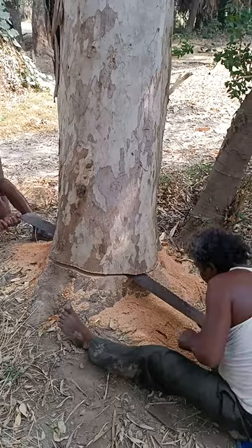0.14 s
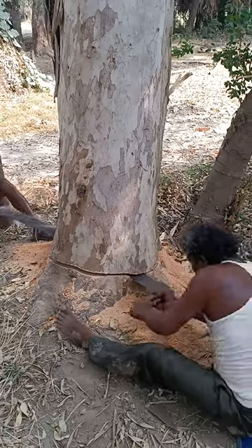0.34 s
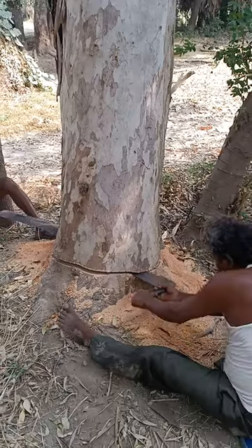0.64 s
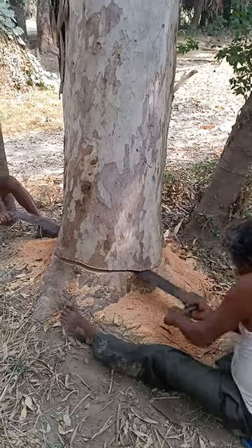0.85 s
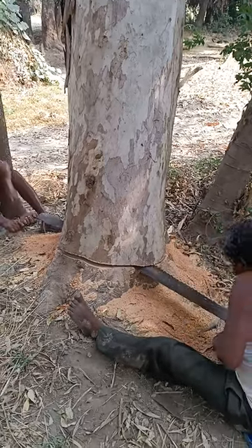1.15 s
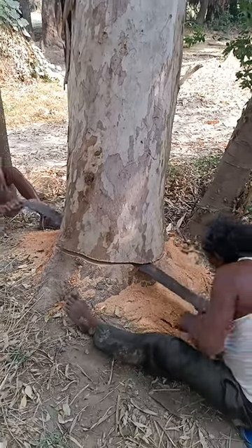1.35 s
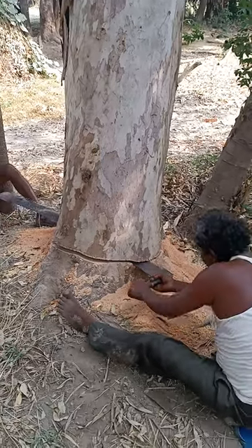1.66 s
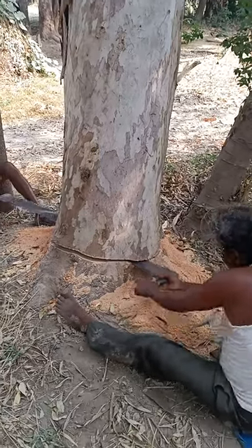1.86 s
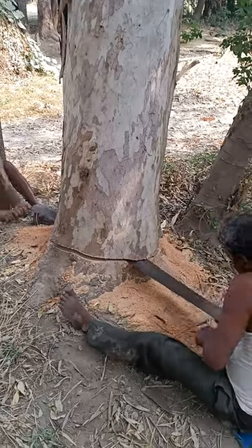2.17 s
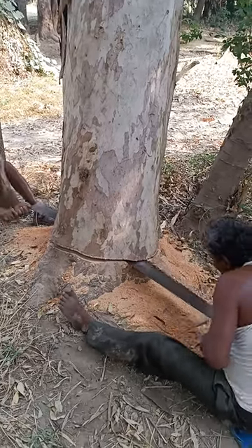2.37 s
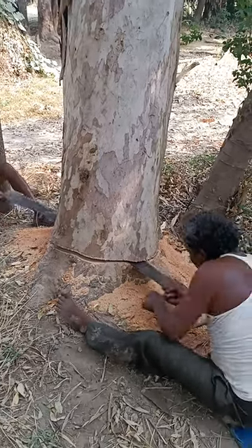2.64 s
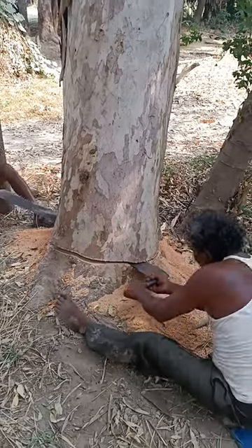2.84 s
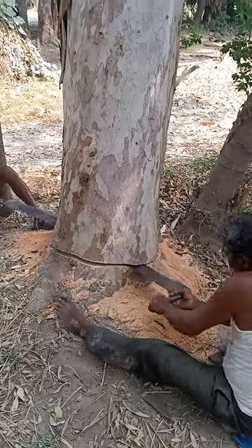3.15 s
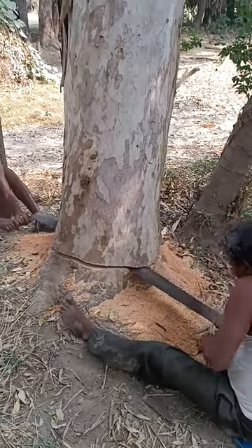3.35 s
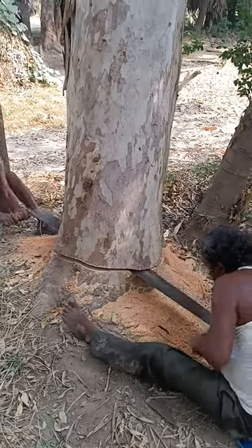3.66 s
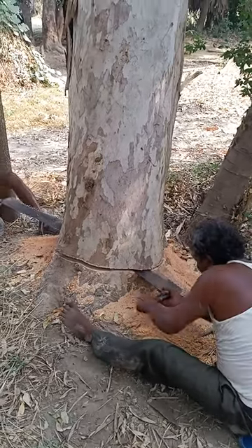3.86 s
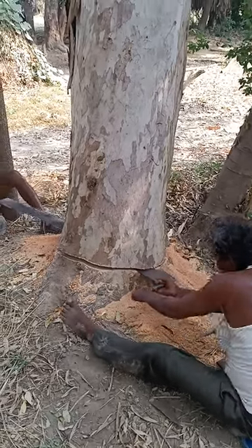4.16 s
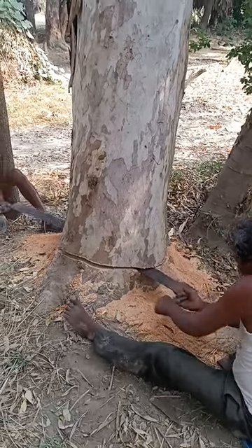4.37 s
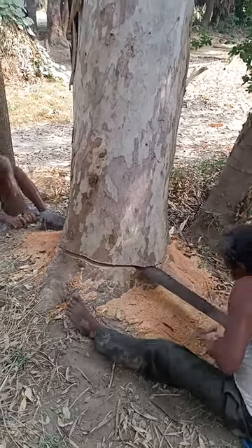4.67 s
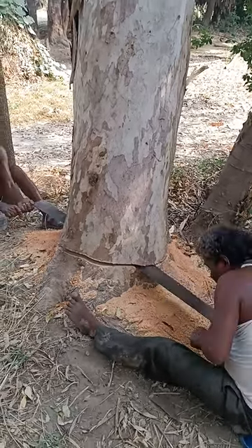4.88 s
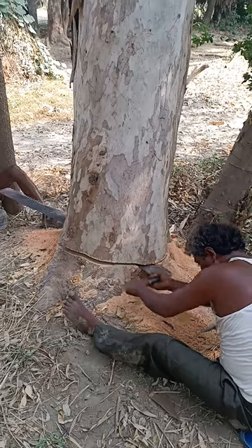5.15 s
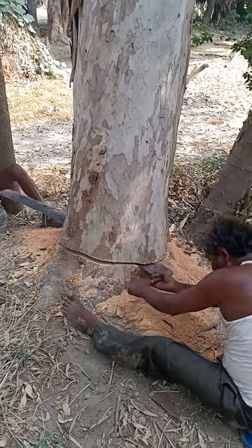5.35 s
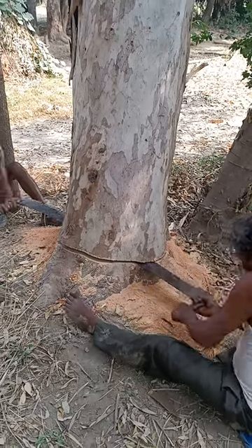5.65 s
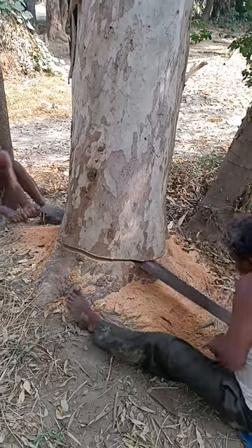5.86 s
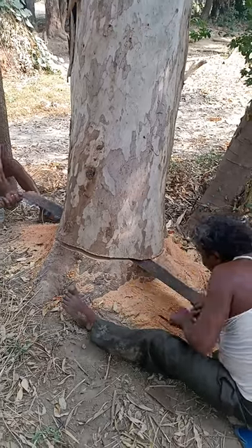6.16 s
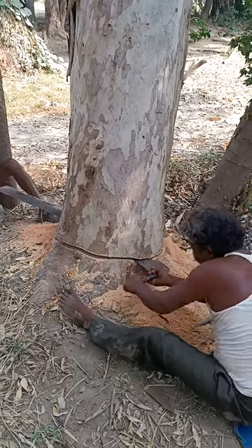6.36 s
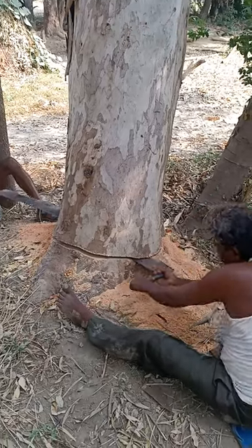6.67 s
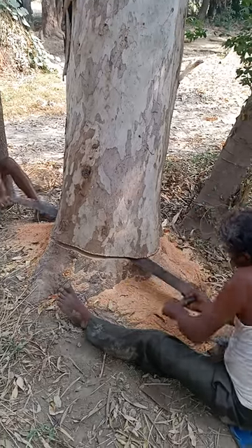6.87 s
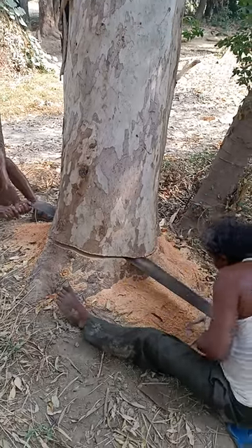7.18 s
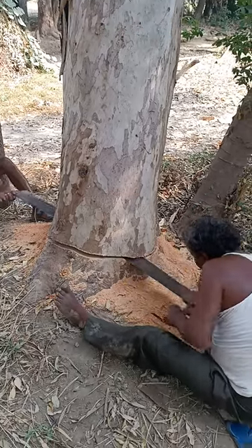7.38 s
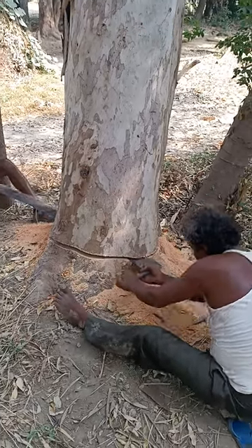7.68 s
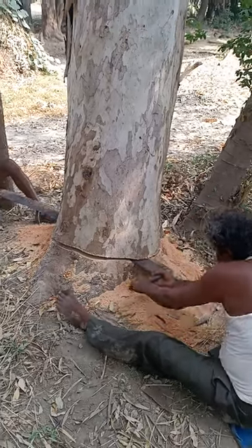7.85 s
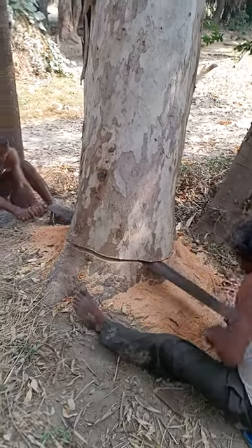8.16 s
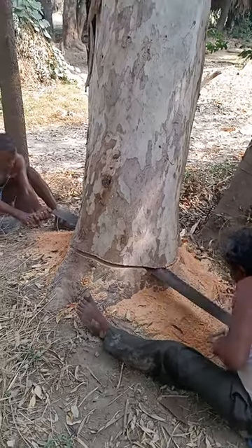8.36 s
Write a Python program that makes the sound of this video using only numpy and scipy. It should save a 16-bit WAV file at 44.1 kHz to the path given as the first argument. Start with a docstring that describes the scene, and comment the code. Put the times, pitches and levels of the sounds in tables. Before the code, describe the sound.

A long hand saw rasps back and forth through a thick tree trunk in steady strokes, while a distant engine thumps quickly and evenly behind.

```python
"""In a hushed grove a long hand saw is pulled to and fro through a standing trunk, near two microphone ports.
Dense clumped ticks, fibres torn by the teeth, excite resonances of wood and blade; now and then a tooth
snags in a decaying noise burst with a snap. Far off a single-cylinder engine thumps steadily in short
decaying tones with echoes, over a hush of spectrally shaped noise."""
import sys
import numpy as np
from scipy import signal
from scipy.fft import rfft, irfft
from scipy.io import wavfile
from scipy.ndimage import uniform_filter1d

SR = 44100
rng = np.random.default_rng(int(sys.argv[2]) if len(sys.argv) > 2 else 0)


def attenuation_scalar(level_db):
    """Turn a level in dB into a linear amplitude multiplier (20 dB per decade)."""
    decades = np.asarray(level_db, float) / 20
    return 10 ** decades


def master_out(mix):
    """Clip the mix to full scale and print it as 16-bit PCM to the path in sys.argv[1]."""
    frames = np.transpose(np.atleast_2d(mix))
    ceiling = np.clip(frames, -1, 1)
    pcm = np.round(ceiling * 32767).astype(np.int16)
    wavfile.write(sys.argv[1], SR, pcm)


N = 375732

# Relative spectrum of the hush: (frequency [Hz], density [dB per Hz])
HUSH_SPECTRUM = [(18, -44), (30, -19), (82, 1), (150, -4), (246, -14.5), (397, -6.5), (523, -18.5),
                 (742, 3.5), (954, -66), (1050, -3), (2540, -5), (3690, -14.5), (6570, -13), (12000, -63),
                 (15600, -102), (22000, -120)]
# Coherence of the hush between the ports: (frequency [Hz], likeness [0-1])
HUSH_COHERENCE = [(60, 0.32), (150, 0.86), (300, 0.64), (700, 0.27), (1400, 0.052), (5000, 0.038)]
HUSH_DB = -52.5  # rms

# Nominal tones of one firing: (delay [s], frequency [Hz], rise [s], fall by 1/e [s], peak [dB], left-right [dB])
FIRING_TONES = [(-.026, 80, .011, .012, -46.5, 1.5), (.0005, 775, .012, .003, -44, -2.5),
                (-.004, 1075, .006, .014, -58, 0), (.004, 395, .005, .015, -62, 0)]
# Reflections off distant trees and walls: (delay [s], level [dB], left-right [dB])
ECHOES = [(.028, -11, -2), (.05, -16, 2)]
FIRST_FIRING_S, FIRINGS_PER_S, SLOWING_PER_S2 = -.116, 11.117, .0046  # the rate is that at the first firing

# Times in which the blade moves, one stroke a row: (start [s], end [s])
STROKE_SPANS = [(.03, .55), (.69, 1.21), (1.24, 1.75), (1.84, 2.38), (2.4, 2.92), (3.02, 3.56),
                (3.59, 4.09), (4.26, 4.79), (4.81, 5.33), (5.44, 5.98), (6, 6.51), (6.66, 7.2),
                (7.23, 7.75), (7.87, 8.39), (8.41, 8.52)]
# Bite of the teeth, one curve a stroke: (time [s], blade rasp level [dB])
BITE_CURVES = [
    [(0.03, -77), (0.082, -45), (0.134, -47.5), (0.186, -35.5), (0.282, -27.5), (0.288, -26), (0.384, -26),
     (0.504, -42), (0.55, -66)],
    [(0.69, -68), (0.786, -45), (0.98, -28.5), (1.088, -28), (1.096, -30.5), (1.122, -28.5), (1.128, -33),
     (1.144, -44.5), (1.21, -54)],
    [(1.24, -59), (1.256, -66), (1.294, -47.5), (1.444, -29.5), (1.512, -28.5), (1.524, -26), (1.612, -30),
     (1.698, -44.5), (1.75, -68)],
    [(1.84, -74), (1.846, -62.5), (2.022, -34), (2.062, -43), (2.086, -34), (2.222, -29), (2.238, -26.5),
     (2.32, -41.5), (2.38, -69)],
    [(2.4, -70), (2.47, -42), (2.556, -34), (2.654, -25), (2.668, -27.5), (2.774, -26), (2.848, -40.5),
     (2.92, -68)],
    [(3.02, -63.5), (3.13, -42.5), (3.142, -35.5), (3.182, -36.5), (3.218, -34), (3.268, -41.5),
     (3.318, -28), (3.438, -28.5), (3.56, -56.5)],
    [(3.59, -71), (3.65, -49), (3.682, -49.5), (3.722, -35), (3.742, -36.5), (3.854, -23), (3.87, -24.5),
     (4.01, -29), (4.09, -63)],
    [(4.26, -70), (4.304, -45), (4.35, -55), (4.366, -35.5), (4.468, -37), (4.472, -29.5), (4.674, -32.5),
     (4.746, -52), (4.79, -76)],
    [(4.81, -71), (4.848, -52), (4.936, -40), (4.942, -34.5), (5.05, -25.5), (5.064, -29), (5.154, -22.5),
     (5.218, -37.5), (5.33, -64)],
    [(5.44, -67), (5.484, -47), (5.528, -50.5), (5.544, -41), (5.722, -32), (5.726, -28), (5.898, -37),
     (5.952, -45), (5.98, -63)],
    [(6.0, -70), (6.014, -53), (6.176, -31), (6.264, -26), (6.368, -27), (6.396, -26), (6.406, -31),
     (6.442, -38.5), (6.51, -62)],
    [(6.66, -62.5), (6.666, -58.5), (6.858, -34.5), (6.89, -34.5), (6.952, -31.5), (6.984, -35.5),
     (6.996, -31.5), (7.126, -33.5), (7.2, -74)],
    [(7.23, -69), (7.266, -51), (7.366, -32.5), (7.432, -30.5), (7.438, -27), (7.604, -23.5),
     (7.612, -31.5), (7.636, -32.5), (7.75, -74)],
    [(7.87, -68), (7.898, -56.5), (8.064, -32), (8.132, -36), (8.142, -29.5), (8.21, -39), (8.266, -28),
     (8.3, -30), (8.39, -65)],
    [(8.41, -72), (8.446, -46), (8.456, -48), (8.466, -42.5), (8.486, -44.5), (8.52, -36)],
]
# Mid-course colour of each stroke against its rasp, and its change over the time of the longest stroke:
# (trunk boom [dB], kerf [dB], sizzle [dB], kerf gained [dB], sizzle gained [dB])
STROKE_COLOURS = [(-11.5, -4, -1.5, 1, -2), (-7.5, -3, -3, -8.5, -5), (-8.5, -4, -0.5, 10, -9),
                  (-10.5, -3, -2, 4, -4), (-9.5, -4, -1, 10.5, -2.5), (-10, -2, -3, 4, -2),
                  (-12.5, -5, -1.5, -1, -1.5), (-8, -3, 0, 1, 1), (-10, -4.5, -1, 7, -10.5),
                  (-9, -1.5, -2, 2, 1), (-10, -5, -1, 3.5, -2), (-10.5, -3, -1, -3, 2.5),
                  (-11, -5.5, -0.5, 6, -2.5), (-10.5, -1, -2, 6, -7), (-6.5, -2.5, -2, 4, -3.5)]
# Trunk boom gained over the time of the longest stroke: (away [dB], back [dB])
BOOM_GAINED_DB = [-3, 9]
# The blade's two strongest rings, rows away and back, over the time of the longest stroke:
# (starting frequency [Hz], rise at the middle [Hz], ending frequency [Hz])
LOWER_RING = [(2770, 160, 2520), (2610, 130, 2730)]
UPPER_RING = [(6180, 330, 5360), (5950, 60, 6000)]
COLOUR_WANDER_DB, COLOUR_WANDER_S = 1.5, 0.043
RING_WANDER, RING_WANDER_S = 0.011, 0.056  # fraction of the frequency, smoothing time

# Relative resonance spectra of trunk, wood at the kerf, blade, blade top and a breaking fibre:
# (frequency [Hz], density [dB per Hz])
TRUNK_MODES = [(65, -38), (110, -21.5), (343, -6), (407, 1), (462, -2), (503, -14), (530, -5), (690, -37),
               (1170, -120)]
KERF_MODES = [(290, -41.5), (500, -7), (616, -8), (746, -1.5), (808, -3), (971, 2), (1200, -7.5),
              (1300, -12), (1690, -49), (2860, -120)]
BLADE_MODES = [(710, -50), (1200, -4), (1790, -5), (1950, -4.5), (2280, -0.5), (2480, -3.5), (2810, 0.5),
               (3780, -4.5), (4300, -8.5), (5590, -58), (9460, -120)]
SIZZLE_MODES = [(2410, -49), (4100, -10), (4660, -4.5), (5100, -5.5), (6270, 0), (7630, -9), (8530, -16.5),
                (9700, -19), (10500, -24), (12500, -32), (13800, -27), (15600, -31)]
SNAP_MODES = [(120, -46), (200, -25), (1270, 8), (2420, 16), (4770, -32), (6170, -27), (10700, -48),
              (13600, -9), (16000, -37)]

# Snags of single teeth:
# (time [s], crumble on the blade [dB], treble against wood [dB], fall by 60 dB [s], snap [dB])
SNAGS = [(0.076, -38, 5, 0.024, -45), (0.271, -22.5, 10, 0.045, -35), (.367, -19, -6, 0.026, -25),
         (.387, -14, 2, 0.021, -30), (.797, -39, 7, .039, -42), (1, -21, -4, .03, -23),
         (1.1272, -12.5, 0, 0.01, 0.5), (1.981, -36, 9, 0.035, -45), (2.08, -32, 20, 0.034, -45),
         (3.286, -31, 25, 0.074, -30), (3.34, -33, -6, 0.014, -21), (3.432, -24, -2, 0.013, -6),
         (3.845, -20, 16, 0.028, -25), (4.01, -29.5, 22, 0.034, -35), (4.3638, -33.5, 2, .066, -35),
         (4.4727, -24, -14, 0.035, -28), (4.942, -35, 17, .054, -35), (5.4795, -40, -17, 0.11, -36),
         (5.7284, -19, 9, 0.028, -20), (5.846, -25, 15, 0.044, -35), (5.8863, -30, 19, 0.04, -35),
         (6.372, -18, 1, 0.026, -30), (6.92, -24, -14, 0.031, -40), (6.9468, -16, 25, 0.013, -25),
         (6.953, -21, 28, 0.018, -27), (6.986, -28, 12, .045, -40), (7.022, -23, -12, 0.025, -30),
         (7.067, -30.5, 19, 0.062, -40), (7.482, -23.5, -7, 0.11, -30), (7.603, -25, 9, 0.016, -16),
         (7.9621, -39.5, 5, 0.096, -45), (8.224, -23, -8, .04, -40), (8.2557, -20, -17, 0.05, -22)]
SNAG_EDGES_DB, SNAG_BOOM_DB = -8, -4  # wood and sizzle against blade, trunk against wood

# The two ports hearing the saw: (frequency [Hz], left-right [dB], left lead [radians], likeness [0-1])
PORTS = [(150, 1.5, 0.5, 1), (380, -3, -0.45, 0.98), (493, -5, 1.5, 0.99), (797, 7, 0.22, 0.87),
         (1284, 4, -2.04, 1), (1440, -4, 1, 0.94), (2380, -1, 0.5, 0.88), (2920, 2.5, 1, 0.42),
         (2900, 6.5, -0.5, 0.3), (4060, -1.5, -1.5, 0.63), (4460, 5, -0.5, 0.4), (6070, -2, -1.5, 0.64),
         (7850, -11, -0.6, 0.22), (8370, 2, -1.5, 1), (12700, -5.5, -2.5, 0.3)]


def evened(x):
    """Power normalization: scales a signal to rms 1."""
    return x / np.sqrt(np.mean(x ** 2) + 1e-20)


def read(points, hz):
    """Interpolation on a logarithmic frequency axis: the columns of a table at these frequencies."""
    f, *columns = np.transpose(points)
    return [np.interp(np.log(hz + 1), np.log(f + 1), c) for c in columns]


def hush():
    """Partly coherent noise: distant air and engine blur as random short-time spectra in drifting patches."""
    frames, hz = N // 256 + 5, np.fft.rfftfreq(1024, 1 / SR)
    a, b, c, d, patches = rng.standard_normal((frames, 513, 5)).T
    patches = uniform_filter1d(patches, size=10, axis=0)
    patches = evened(uniform_filter1d(patches, size=10, axis=1))
    same = np.clip(read(HUSH_COHERENCE, hz)[0], 0, 1)[:, None]
    left = a + 1j * b
    right = same * left + np.sqrt(1 - same ** 2) * (c + 1j * d)
    density_db = read(HUSH_SPECTRUM, hz)[0][:, None] + 2.2 * patches
    spectra = np.array([left, right]) * attenuation_scalar(density_db)
    noise = signal.istft(spectra, nperseg=1024, noverlap=768)[1][:, :N]
    return attenuation_scalar(HUSH_DB) * evened(noise)


def engine():
    """Periodic excitation: each firing sends a low thump and short pipe tones, a little uneven, with two echoes."""
    even = np.arange(0, N / SR - 2 * FIRST_FIRING_S, 1 / FIRINGS_PER_S)
    fired = FIRST_FIRING_S + even + SLOWING_PER_S2 / FIRINGS_PER_S * even ** 2 / 2
    pad, t = SR // 4, np.arange(SR // 8) / SR
    direct = np.zeros((2, N + SR))
    for start, chance in zip(fired, rng.standard_normal((len(fired), len(FIRING_TONES), 2))):
        for (delay, hz, rise, fall, db, pan_db), (louder, sharper) in zip(FIRING_TONES, chance):
            attack = np.sin(np.pi / 2 * t / rise) ** 2
            shape = np.where(t < rise, attack, np.exp((rise - t) / fall))
            tone = shape * np.sin(2 * np.pi * hz * (1 + .005 * sharper) * t) * attenuation_scalar(db + 1.2 * louder)
            at = pad + round((start + delay) * SR)
            direct[:, at:][:, :len(t)] += tone * attenuation_scalar([[pan_db / 2], [-pan_db / 2]])
    out = direct.copy()
    for delay, db, pan_db in ECHOES:
        out += attenuation_scalar([[db + pan_db / 2], [db - pan_db / 2]]) * np.roll(direct, round(delay * SR), axis=1)
    return out[:, pad:pad + N]


def grove(x, low_hz):
    """Diffuse scattering: trunks and ground add a short tail, other for each port; long waves pass them by."""
    t = np.arange(SR // 2) / SR
    decay = attenuation_scalar(-60 * t / 0.23)  # 60 dB in 0.23 s
    tail = rng.standard_normal((2, len(t))) * decay * np.minimum(t / 0.0053, 1)
    highpass = signal.butter(2, low_hz, "high", fs=SR)
    tail = signal.lfilter(*highpass, tail / np.linalg.norm(tail[0]))
    return signal.oaconvolve(x, tail, axes=1)[:, :N]


def wobble(seconds):
    """Low-pass random modulation: smooth chance of rms 1, averaged twice over this time."""
    span = round(seconds * SR) + 1
    return evened(uniform_filter1d(uniform_filter1d(rng.standard_normal(N), span), span))


def moving_ring(table, way, done):
    """Resonance shift: a blade ring's frequency glides along the stroke and wanders a little."""
    start_hz, rise_hz, end_hz = np.array(table)[way].T
    glide = start_hz + (end_hz - start_hz) * done + rise_hz * np.sin(np.pi * done)
    return glide * (1 + RING_WANDER * wobble(RING_WANDER_S))


def stroke_controls():
    """Reciprocating drive: rasp level, three colours and two ring pitches from the stroke and its progress."""
    t, (starts, ends) = np.arange(N) / SR, np.transpose(STROKE_SPANS)
    which = np.maximum(np.searchsorted(starts, t, "right") - 1, 0)
    done = np.clip((t - starts[which]) / (ends - starts).max(), 0, 1)  # 1 = the longest stroke's time
    way = which % 2  # 0 away, 1 back
    *colours, kerf_gained, sizzle_gained = np.array(STROKE_COLOURS)[which].T
    gained = np.array(BOOM_GAINED_DB)[way], kerf_gained, sizzle_gained
    colours = [c + g * (done - .5) + COLOUR_WANDER_DB * wobble(COLOUR_WANDER_S)
               for c, g in zip(colours, gained)]
    rings = [moving_ring(table, way, done) for table in (LOWER_RING, UPPER_RING)]
    rasp_db = np.interp(t, *np.concatenate(BITE_CURVES).T)
    return rasp_db, *colours, *rings


def ticks(per_s, spread_db):
    """Random impulse train: ticks, a few of them large; two rows share sizes but not signs."""
    size = attenuation_scalar(spread_db * np.minimum(rng.exponential(1, N), 5))
    size = size * (rng.random(N) < per_s / SR)
    return evened(size * rng.choice([-1., 1.], (2, N)))


def flecks(lo_hz, hi_hz, per_s, t60, count=14):
    """Modal excitation: sparser ticks, each ringing one narrow mode of the many in this range."""
    hits, mode = ticks(per_s, 3.56), rng.integers(0, count, N)
    r = 1000 ** (-1 / (t60 * SR))  # falls by 60 dB in t60
    out = np.zeros((2, N))
    for k, angle in enumerate(2 * np.pi * np.geomspace(lo_hz, hi_hz, count) / SR):
        out += signal.lfilter([np.sin(angle)], [1, -2 * r * np.cos(angle), r * r], hits * (mode == k))
    return evened(out)


def resonate(x, hz, width):
    """Heterodyning: shifts the curve hz to zero, smooths, shifts back, a moving resonance of gain 1."""
    turn = np.exp(2j * np.pi * np.cumsum(hz) / SR)
    r = np.exp(-np.pi * width / SR)
    return 2 * (turn * signal.lfilter([1 - r], [1, -r], x / turn)).real


def ring(spectrum):
    """Minimum phase: the causal response of energy 1 that has this spectrum."""
    hz = abs(np.fft.fftfreq(8192, 1 / SR))
    log_gain = np.log(attenuation_scalar(np.maximum(read(spectrum, hz)[0], -90)))
    taps = np.fft.ifft(np.exp(np.conj(signal.hilbert(log_gain)))).real[:3072]
    return taps / np.linalg.norm(taps)


def mottled(x, patchy_db):
    """Time-varying contact: as the teeth in contact keep changing, patches of the spectrum swell and fade."""
    z = signal.stft(x, nperseg=256, noverlap=192)[2]
    patches = rng.standard_normal(z.shape[:0:-1]).T
    patches = uniform_filter1d(patches, size=3, axis=0)
    patches = evened(uniform_filter1d(patches, size=16, axis=1))
    return signal.istft(z * attenuation_scalar(patchy_db * patches), nperseg=256, noverlap=192)[1][:, :N]


def snags():
    """Transient fracture: a snag crumbles and snaps a fibre; rows for trunk, kerf, blade, sizzle and snap."""
    out, t = np.zeros((5, 2, N + SR)), np.arange(SR // 8) / SR
    for (s, db, bright_db, t60, snap_db), crumbs in zip(SNAGS, rng.standard_normal((len(SNAGS), 2, SR // 8))):
        at = round(s * SR)
        burst = crumbs * attenuation_scalar(db - 60 * t / max(t60, .005)) * np.minimum(t / .001, 1)
        wood_db, sizzle_db = SNAG_EDGES_DB - bright_db / 2, SNAG_EDGES_DB + bright_db / 2
        shares = attenuation_scalar([wood_db + SNAG_BOOM_DB, wood_db, 0, sizzle_db])[:, None, None]
        out[:4, :, at:][:, :, :len(t)] += shares * burst
        out[4, :, at] = -attenuation_scalar(snap_db)
    return out[:, :, :N]


def ports(near, scattered):
    """Phase and coherence: the right port hears the left's sound shifted, partly replaced by a scattered one."""
    tilt_db, lead, same = read(PORTS, np.fft.rfftfreq(N, 1 / SR))
    same, left = np.clip(same, 0, 1), rfft(near)
    right = same * left * np.exp(-1j * lead) + np.sqrt(1 - same ** 2) * rfft(scattered)
    return irfft([left * attenuation_scalar(tilt_db / 2), right * attenuation_scalar(-tilt_db / 2)], N)


def saw():
    """Source and resonator: ticks follow the stroke, chatter as the blade judders, and ring wood and steel."""
    rasp_db, boom_db, kerf_db, sizzle_db, lower_hz, upper_hz = stroke_controls()
    judder_db = 0.67 * wobble(0.011) + 0.97 * wobble(0.0057)
    trunk, kerf, blade, sizzle, snap = snags()

    trunk += ticks(4000, 2.2) * attenuation_scalar(rasp_db + boom_db + judder_db)
    kerf_ticks = evened(ticks(6000, 3.03) + attenuation_scalar(-20) * flecks(564, 1148, 400, 0.041))
    kerf += kerf_ticks * attenuation_scalar(rasp_db + kerf_db + 1.06 * judder_db)
    blade_ticks = evened(ticks(9000, 2.44) + attenuation_scalar(-12.5) * flecks(1508, 3612, 900, 0.064))
    blade += blade_ticks * attenuation_scalar(rasp_db - 2.5 + judder_db)
    sizzle_ticks = evened(ticks(14000, 1.37) + attenuation_scalar(-10.5) * flecks(4506, 8035, 1200, 0.051))
    sizzle += sizzle_ticks * attenuation_scalar(rasp_db + sizzle_db - 3.5 + 1.87 * judder_db)

    blade += resonate(blade, lower_hz, 270)
    sizzle += attenuation_scalar(-3) * resonate(sizzle, upper_hz, 530)
    drives = trunk, kerf, blade, sizzle, snap
    bodies = TRUNK_MODES, KERF_MODES, BLADE_MODES, SIZZLE_MODES, SNAP_MODES
    *rasp, snap = (signal.oaconvolve(drive, ring(body)[None], axes=1)[:, :N]
                   for drive, body in zip(drives, bodies))
    near, scattered = mottled(sum(rasp), 1.07) + snap
    return ports(near, scattered)


def scene():
    """Superposition: saw and engine with their scatter, over the hush."""
    far = engine()
    far = far + attenuation_scalar(-14) * grove(far, 35)
    cut = saw()
    return cut + attenuation_scalar(-16.5) * grove(cut, 440) + far + hush()


def low_pass(x):
    """Removes everything above the highest recorded frequency."""
    return signal.sosfilt(signal.butter(12, 16500, fs=SR, output="sos"), x)


def record(dry):
    """Band limitation: a highpass removes the deepest bass, and a steep lowpass ends the sound at 15.6 kHz."""
    highpass = signal.butter(3, 52, "high", fs=SR, output="sos")
    mix = signal.sosfilt(highpass, dry)
    lowpass = signal.firwin(1023, 15600, window=("kaiser", 6), fs=SR)
    mix = signal.oaconvolve(mix, lowpass[None], "same")
    return low_pass(mix)


dry = scene()
out = record(dry)
master_out(out)
```